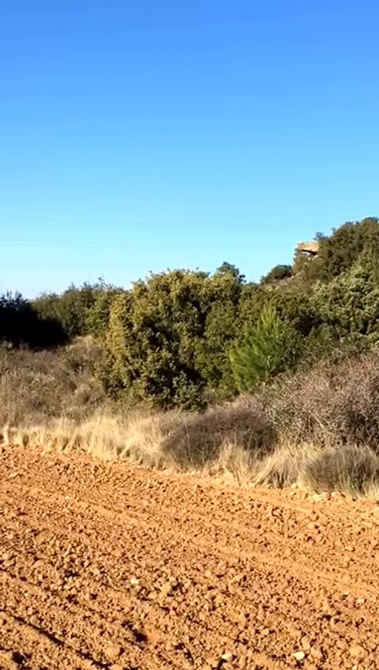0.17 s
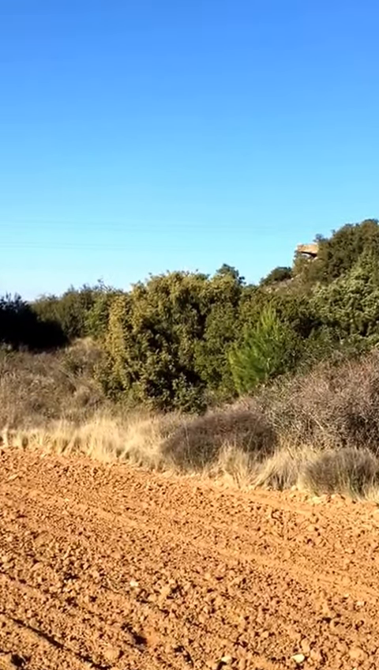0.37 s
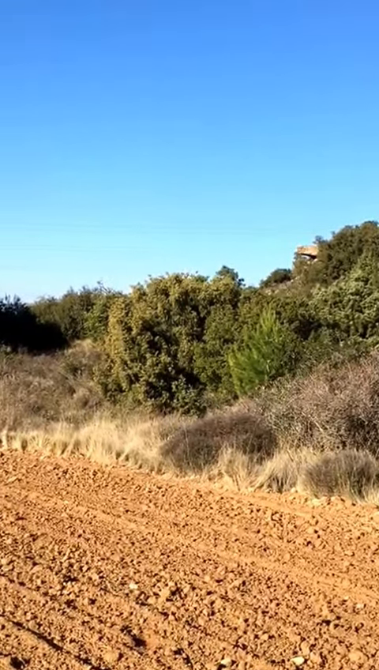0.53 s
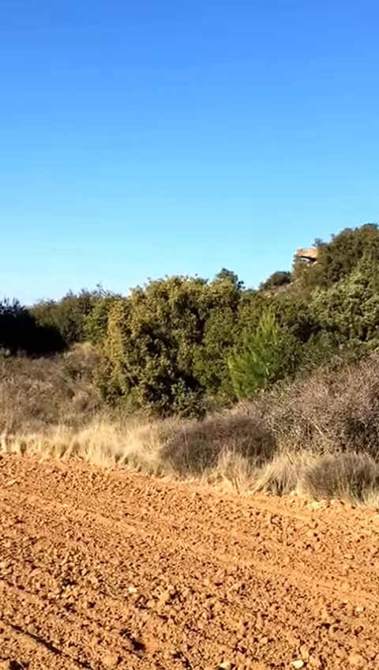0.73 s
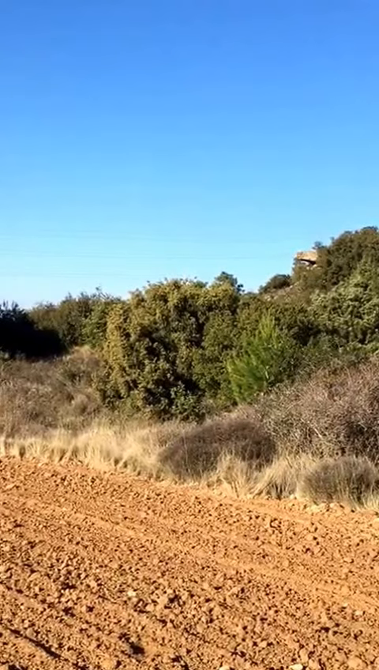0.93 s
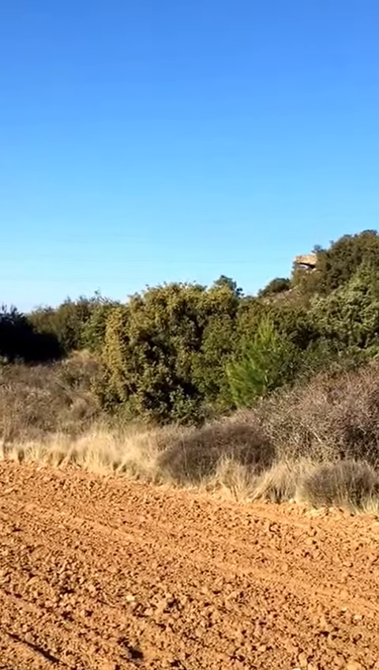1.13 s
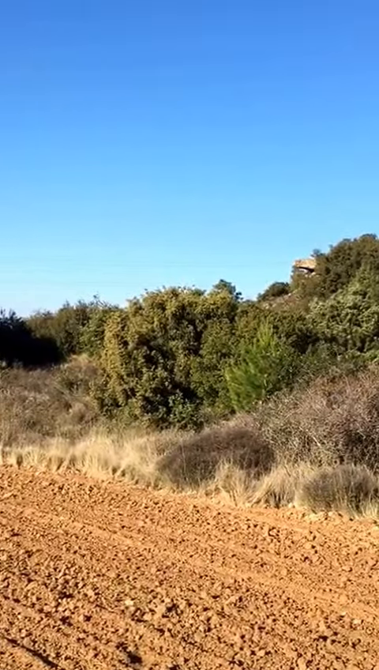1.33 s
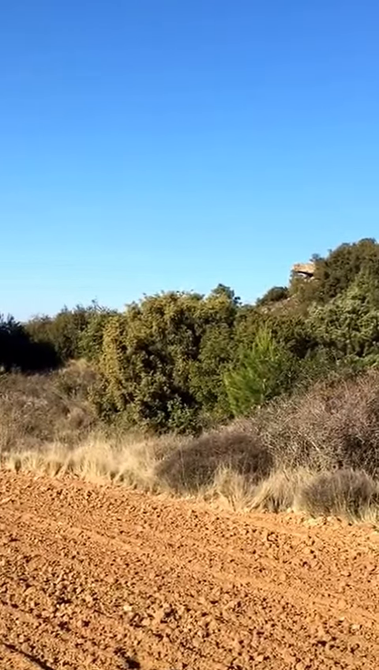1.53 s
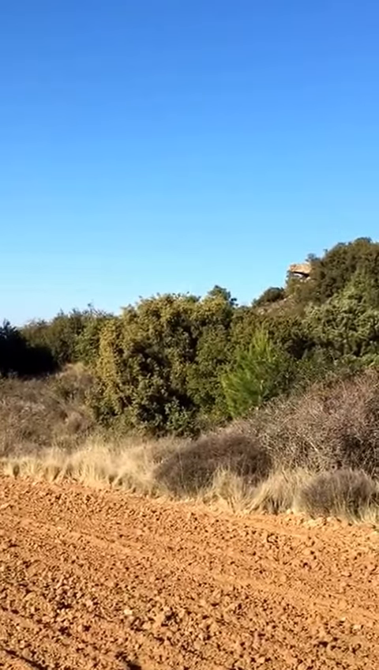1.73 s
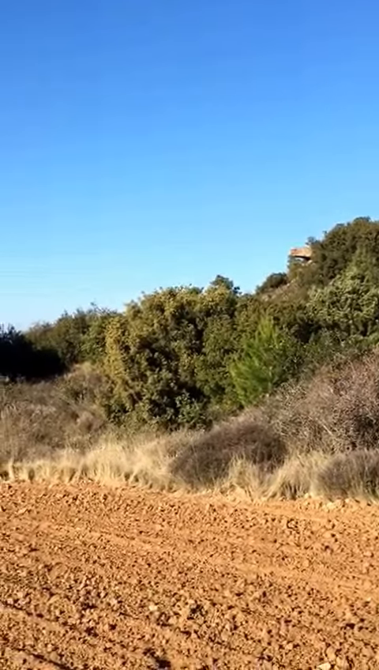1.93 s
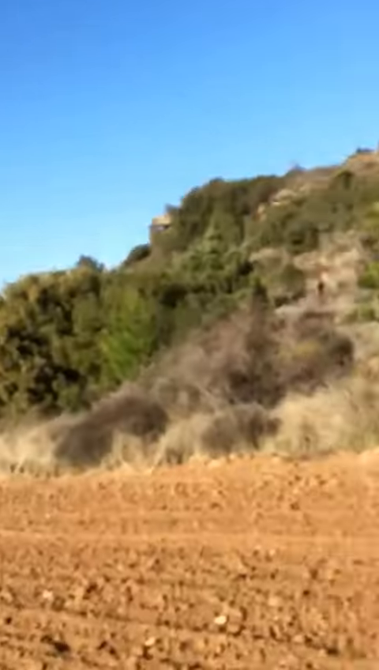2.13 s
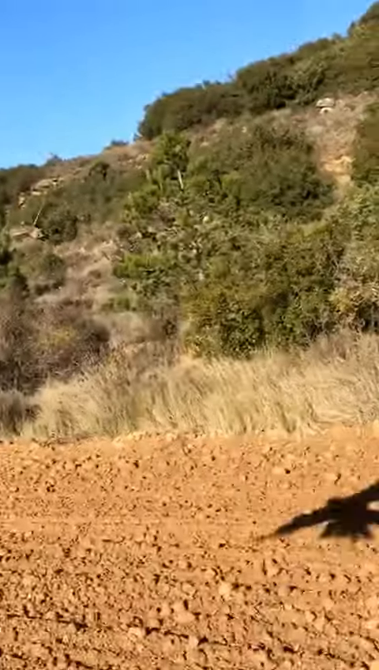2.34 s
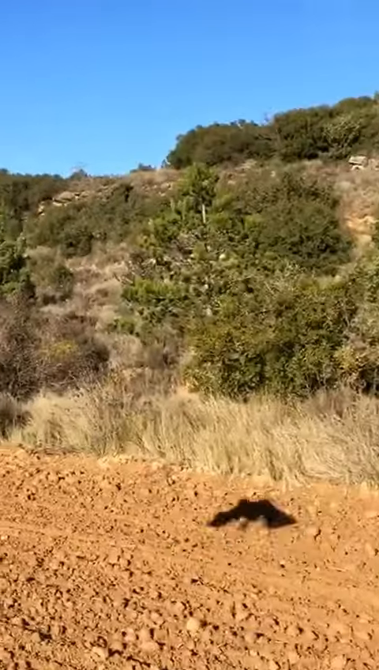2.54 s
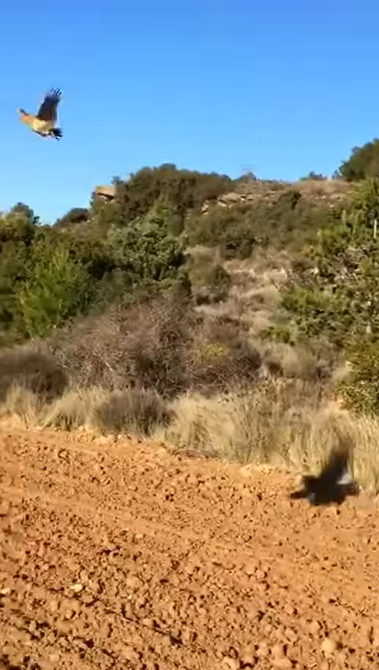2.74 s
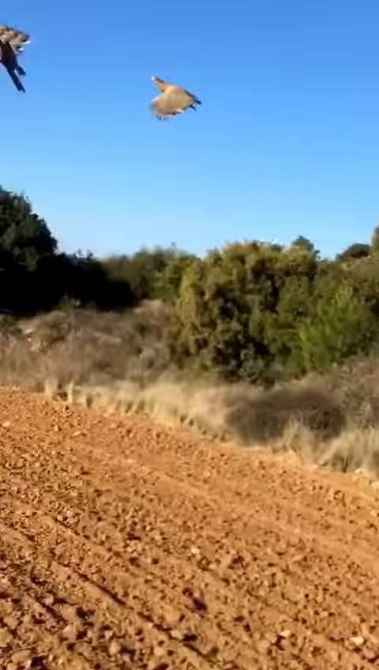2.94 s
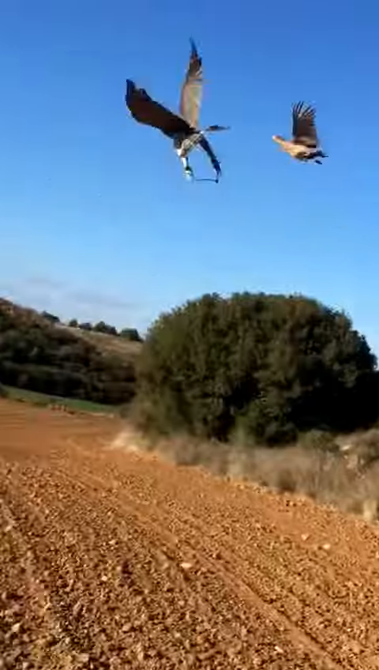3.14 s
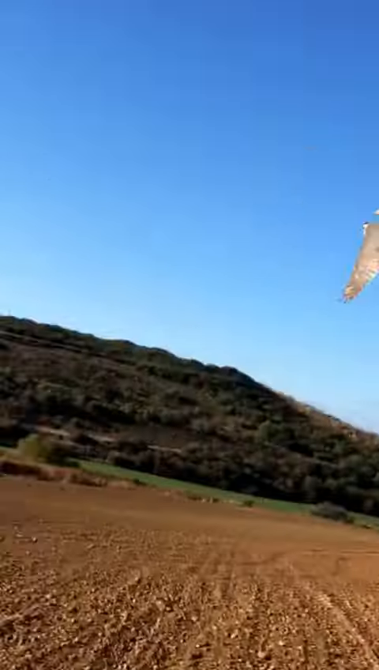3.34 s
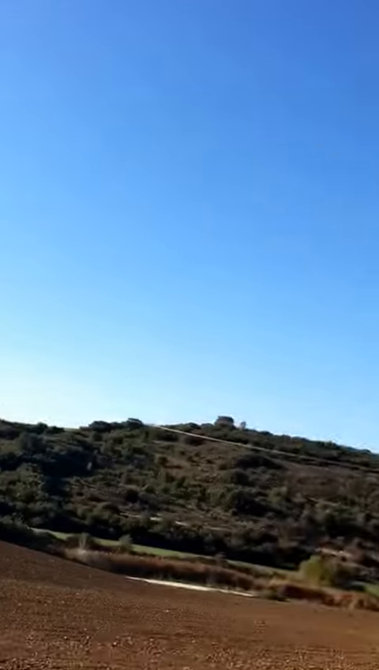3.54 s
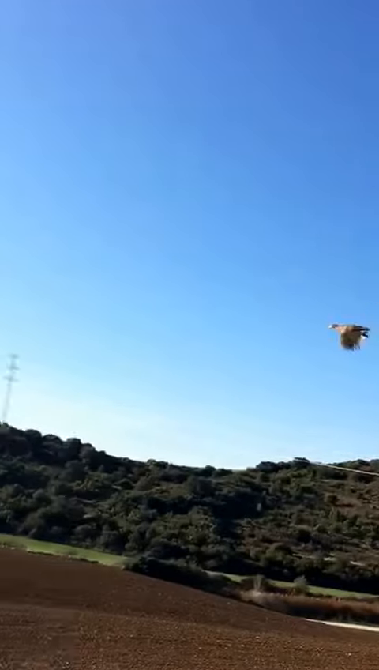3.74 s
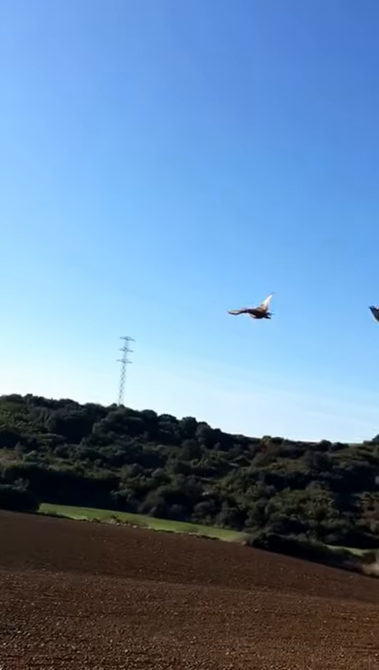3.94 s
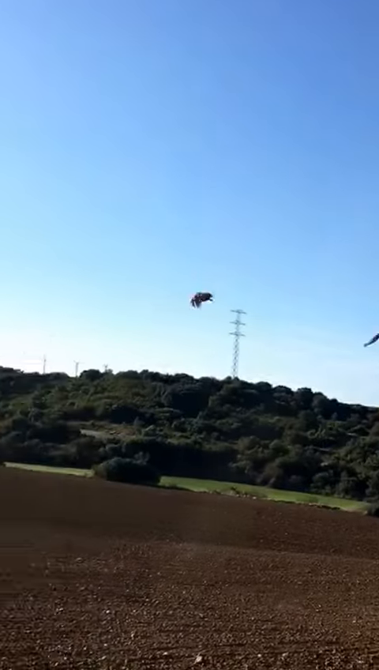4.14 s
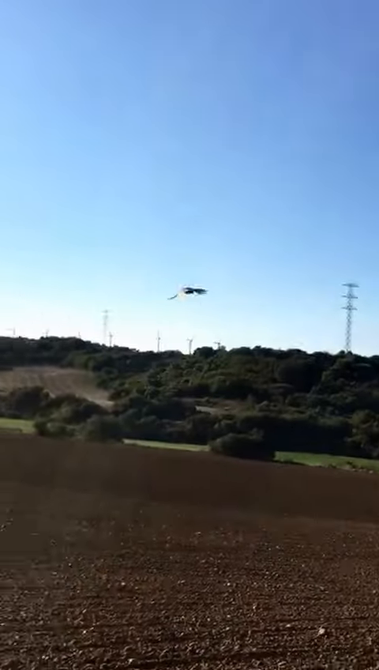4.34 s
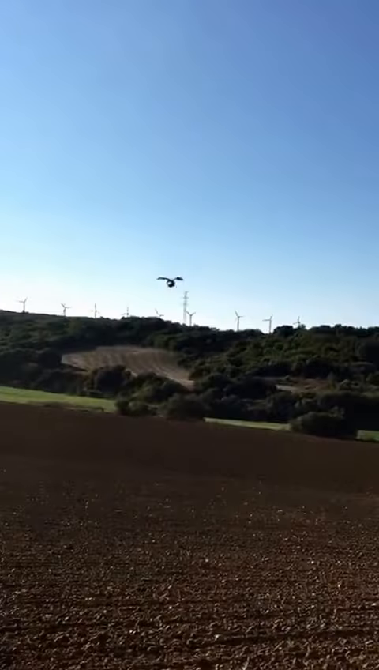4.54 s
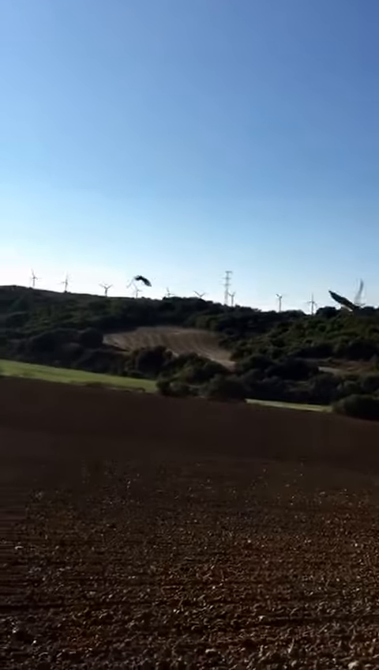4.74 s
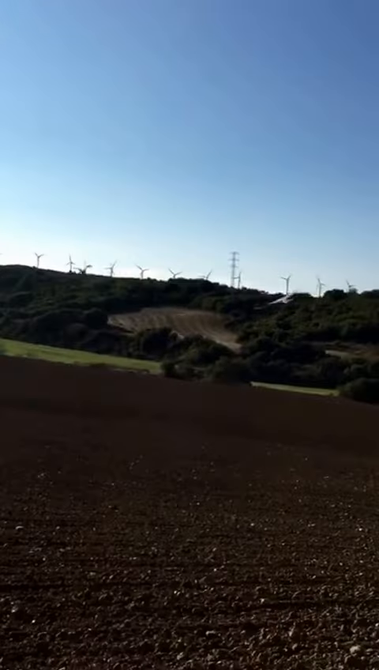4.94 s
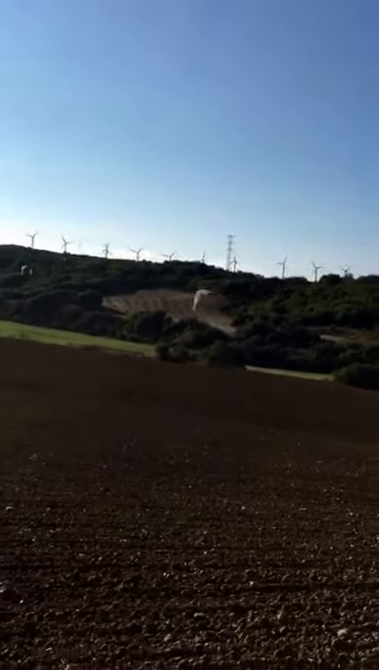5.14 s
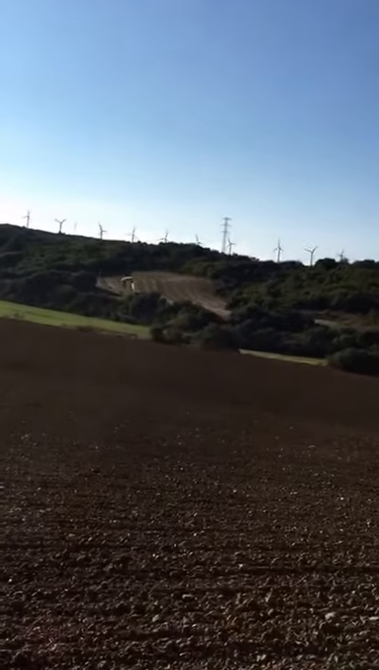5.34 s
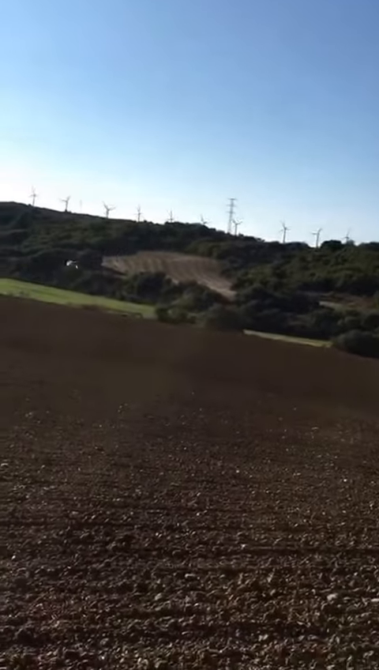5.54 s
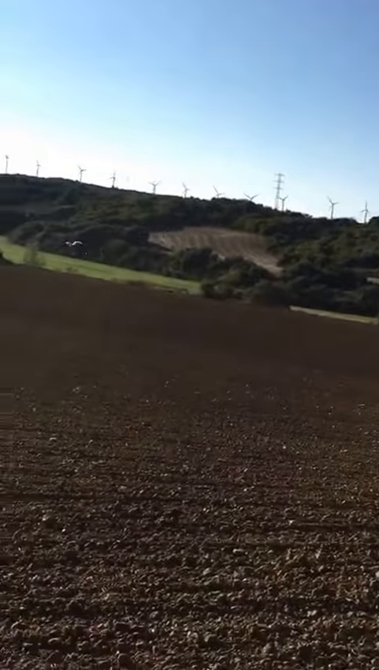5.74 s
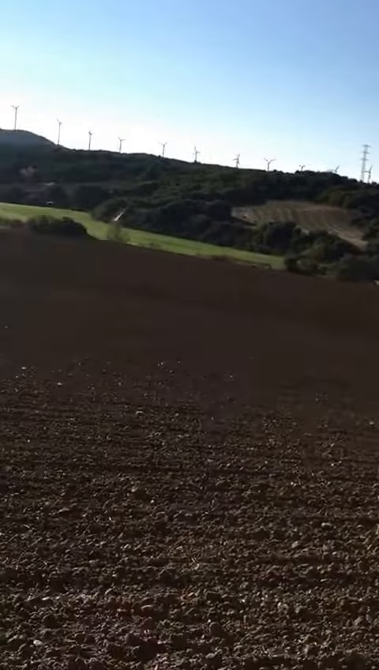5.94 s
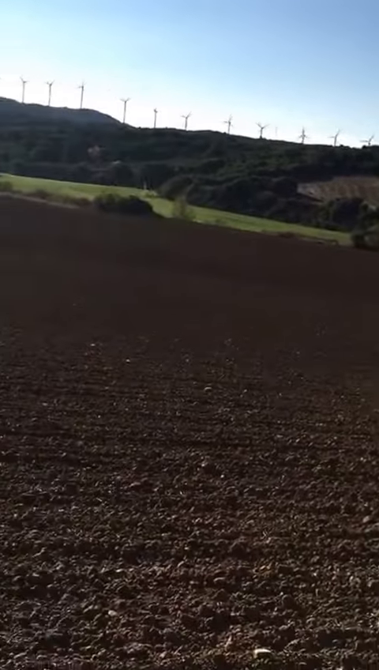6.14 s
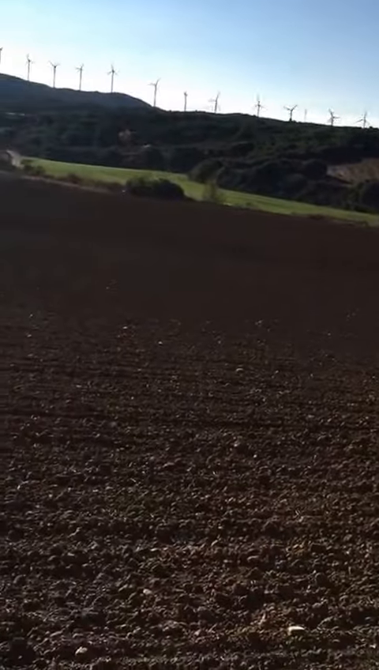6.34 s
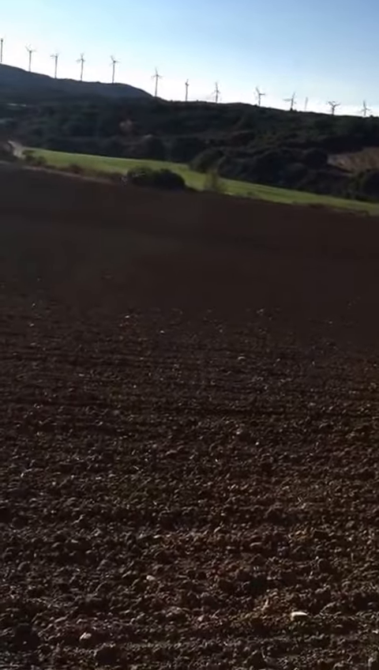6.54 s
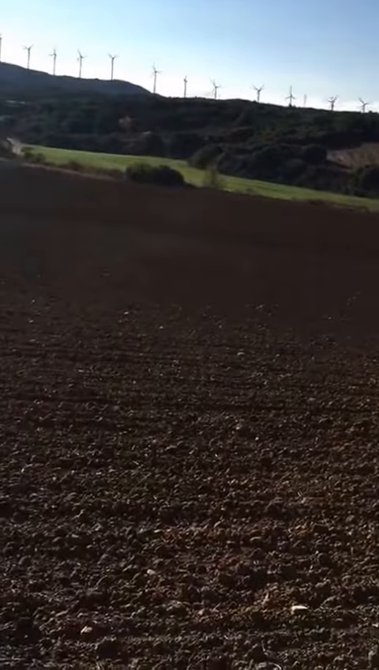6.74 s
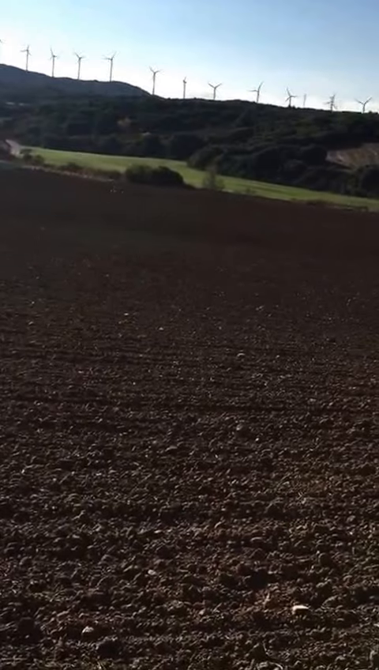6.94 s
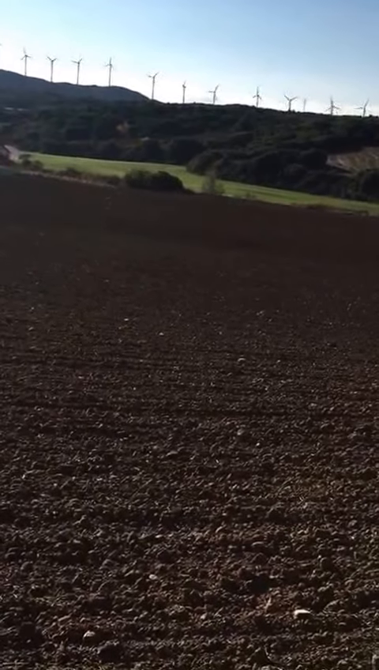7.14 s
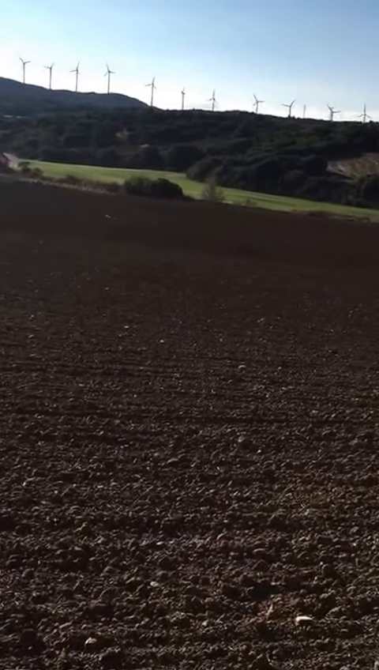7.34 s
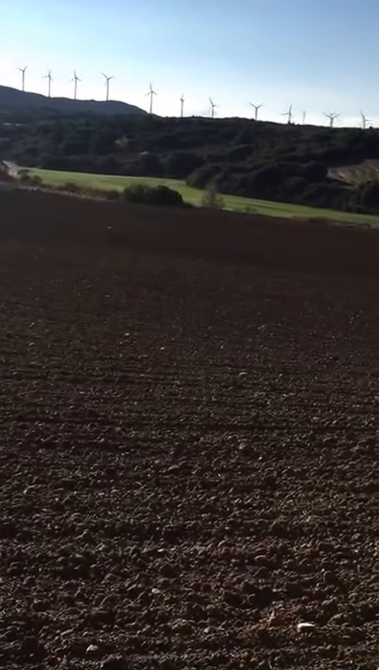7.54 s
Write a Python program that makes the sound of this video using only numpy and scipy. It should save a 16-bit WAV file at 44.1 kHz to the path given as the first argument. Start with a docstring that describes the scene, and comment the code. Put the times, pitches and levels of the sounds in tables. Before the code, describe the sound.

An outdoor handheld microphone hears a quiet ploughed field, then a sudden close flush of partridges. Wing strokes thud and puff against the microphone among snapping, rustling grass and very high piercing chirps. Fast fluttering hums and small slaps move off, the short whistled alarm calls fading with slight outdoor echoes, until only faint wind, low rumble and a few soft knocks are left.

```python
"""Wing strokes buffet the microphone as partridges burst from the edge of a ploughed field and pass close over.
Feathers and dry grass crackle around them; then the wings whirr away and thin, high alarm notes fade.
Close strokes are growing vortices with turbulence; distant beats are short falling hums, slaps and clicks.
Notes are gliding two-voiced tones with echoes; grass, wake, wind and the quiet farmland are shaped noise."""
import sys
import numpy as np
from scipy import signal
from scipy.fft import rfft, irfft
from scipy.io import wavfile
from scipy.ndimage import uniform_filter1d

SR = 44100
rng = np.random.default_rng(int(sys.argv[2]) if len(sys.argv) > 2 else 0)


def master(y):
    """Save y as 16-bit WAV."""
    cut = np.clip(np.atleast_2d(y).T, -1, 1)
    pcm = np.round(cut * 32767)  # scale
    wavfile.write(sys.argv[1], SR, pcm.astype(np.int16))


N = 339129
TIME = np.arange(N) / SR  # s

# Far wind over the hills: (time [s], level [dB])
WIND_LEVEL = [(0, -62), (1.45, -67), (5.0, -64), (5.8, -60), (7.69, -62)]
# Spectrum of that wind: (frequency [Hz], level [dB])
WIND_SPECTRUM = [(120, -26.5), (200, -7), (310, -1.5), (379, -5.5), (675, 0.5), (727, -2), (1230, -1.5),
                 (1680, -6.5), (2610, -18.5), (4000, -32.5), (5200, -48), (8800, -120)]
# Gusts in the far scrub: (time [s], peak level [dB], half width to 1/e [s])
SCRUB_GUSTS = [(6.27, -60, 0.064), (6.579, -54, 0.26), (7.14, -56.5, 0.14)]
# Spectrum of the gusts: (frequency [Hz], level [dB])
GUST_SPECTRUM = [(200, -18), (500, -8), (900, 2.5), (1400, 3.5), (2000, -8.5), (2700, -21), (4000, -29),
                 (8000, -51)]
# Spectrum of the rumble and faint hiss: (frequency [Hz], level [dB])
FLOOR_SPECTRUM = [(12, -63.5), (20, -30), (46, -3.5), (69, -1.5), (116, -12.5), (143, -17.5), (275, -31.5),
                  (429, -29), (464, -48.5), (603, -36.5), (993, -27.5), (2070, -47), (5170, -49.5),
                  (6550, -49), (10500, -53), (13600, -86), (22000, -120)]
FLOOR_DB = -53
# Spectrum of the pulsing high hiss: (frequency [Hz], level [dB])
BUZZ_SPECTRUM = [(2000, -33.5), (4500, -14), (6500, 9), (8200, -7), (9700, 2.5), (11000, -21)]
BUZZ_HZ = 60

# Nearness of the birds, as the level of their feather noise: (time [s], level [dB])
NEARNESS_CURVE = [(1.7, -98), (1.78, -62), (1.91, -57.5), (1.99, -54.5), (2.49, -54), (2.9, -58),
                  (3.3, -58.5), (4.9, -73), (5.6, -79)]

# Dry snaps of stalks and feathers: (time [s], level [dB], tilt [dB per octave])
LOUD_SNAPS = [(0.494, -48.5, 1.5), (1.8306, -35, -1), (1.8620, -37, 2.5), (1.9230, -39.5, -5),
              (1.9513, -38, -4), (1.9954, -18.5, -2), (2.075, -31, -3), (2.1330, -11, -10.5),
              (2.1997, -34.5, -3), (2.2837, -33, -1.5), (2.334, -40, -2.5), (2.4132, -35.5, -0.5),
              (2.555, -35.5, 0), (2.6517, -38, 0), (2.8280, -28.5, 1), (2.9098, -39.5, -5),
              (3.0491, -35, -7.5), (3.1177, -38, -3), (3.1917, -36, -3), (3.399, -33, -0.5),
              (3.5425, -27.5, 1), (3.7070, -40, -3.5), (3.9410, -40, -8.5)]
# Spectrum of a snap before its tilt: (frequency [Hz], level [dB])
SNAP_SPECTRUM = [(150, -4), (500, -10.5), (1100, -2.5), (1800, -0.5), (2800, -5), (4000, -4.5),
                 (6000, -7.5), (8500, -9.5), (10500, -17)]
SNAP_DECAY_S = 0.0016
SNAP_LEAD_S = 256 / SR  # silence padded ahead of a snap
SMALL_SNAPS_PER_S = 4.3
SMALL_SNAP_DB, SMALL_SNAP_SPREAD_DB = 15.5, 5.5  # relative to the nearness curve; chance spread
SMALL_SNAP_TILT_DB = -9  # per octave

# Wings brushing through dry grass: (time [s], peak level [dB])
GRASS_SWISHES = [(1.747, -42), (2.118, -32.5), (2.288, -52), (2.442, -42.5), (3.36, -53.5)]
SWISH_RISE_S, SWISH_FALL_S = 0.016, 0.0096
# Spectrum of the grass and feathers: (frequency [Hz], level [dB])
RUSTLE_SPECTRUM = [(120, -11.5), (300, -2), (700, 2), (1100, 3.5), (1800, 1), (2500, -0.5), (4900, -5),
                   (7000, -7), (9400, -6.5), (10500, -18)]
RUSTLE_DB = 5  # relative to the nearness curve

# Spectrum of the disturbed air: (frequency [Hz], level [dB])
WAKE_SPECTRUM = [(60, -11.5), (150, -1.5), (290, 3), (600, -5.5), (900, -13), (2000, -54.5)]
WAKE_DB, WAKE_FOLLOW = -54, 0.67  # level at a nearness of -60 dB; dB per dB of nearness
TRAIL_DB, TRAIL_S = -31, 0.036  # churned air left by a stroke, relative to it; its decay

# Close wing strokes: (time [s], level [dB], middle pitch [Hz], turbulence before a common lift [dB])
CLOSE_STROKES = [(1.802, -44.5, 467, -18), (1.955, -31.5, 68.3, -18), (1.996, -22.5, 71, -6.5),
                 (2.075, -18.5, 80, -12), (2.111, -12, 134.6, -8.5), (2.129, -2.5, 71.4, -8),
                 (2.130, -11.5, 198.8, -1), (2.16, -25.5, 260, -2), (2.184, -25.5, 288, -11),
                 (2.207, -26, 98, -9), (2.25, -34, 309, -4), (2.27, -31.5, 79.2, -25),
                 (2.402, -26, 70, -14.5), (2.571, -35, 480, -11), (2.579, -24, 439, 0),
                 (2.586, -26, 509, -1), (2.598, -27, 275, 2.5), (2.613, -20.5, 79.5, -7),
                 (2.704, -22.5, 78.6, -22), (2.772, -22, 196, -30), (2.79, -20, 84.6, -36),
                 (2.823, -15, 218.5, -8), (2.844, -31.5, 268, -31), (2.93, -31.5, 129, -23),
                 (2.955, -36.5, 153, -16), (3.055, -39, 117, -14), (3.642, -44, 134, -17)]
TURBULENCE_LIFT_DB = 2.5
STROKE_S, STROKE_SHRINK = 0.045, 0.49  # length of a 100 Hz vortex; power of pitch that shortens higher ones
SAG_OCTAVES, SAG_OCTAVES_PER_DB = 2.09, 0.035  # pitch fall of a 0 dB vortex; weaker ones fall less
RAGGED = 0.35  # irregular swirl, relative to a vortex's own swing

# Alarm notes: (time [s], length [s], level [dB], entry pitch [Hz], held pitch [Hz], upper voice [dB])
# Pitches are those of the direct sound; the upper voice is relative to the note.
CALLS = [(1.997, 0.05, -31.5, 9360, 7340, -2.5), (2.023, 0.061, -41.5, 6970, 6300, 2),
         (2.069, 0.033, -28.5, 8120, 7125, -36), (3.329, 0.046, -30.5, 6440, 7100, -7),
         (3.431, 0.058, -33.5, 5700, 6260, -33), (3.718, 0.049, -29, 6470, 7020, -11),
         (3.835, 0.0757, -39.5, 5060, 6100, -4), (4.19, 0.061, -41, 6350, 6970, -7),
         (4.344, 0.08, -44.5, 5330, 6840, -29), (4.726, .054, -50.5, 5885, 6920, -11),
         (5.139, 0.063, -54, 5500, 6870, -18), (5.727, 0.056, -56.5, 5760, 6640, -8),
         (6.357, 0.062, -59.5, 5300, 6720, -12), (6.758, 0.053, -62, 5150, 6640, -22.5)]
# Course of one note, before loudness scales its arch: (share of its length, level [dB])
CALL_SWELL = [(0, -14.5), (.1, -11.5), (.28, -7.5), (.38, -2.5), (.72, 1.5), (.88, -7), (1, -6.5)]
NOTE_EXIT = 0.76  # share of the held pitch at which a note ends
ROUGH_FAINT, ROUGH_LOUD = 0.46, 0.3  # roughness (0-1) of the faintest and the loudest notes
NEAR_DOPPLER, FAR_DOPPLER = 1.018, 1.065  # pitch ratios of the echoes

# The departing birds: (first beat [s], last beat limit [s], first beat period [s], slowing [s per beat])
HUM_BIRD = (3.101, 5.4, .0799, 0)
SLAP_BIRD = (3.719, 5.95, .0806, .00008)
# Strength of the humming bird's beats, before chance differences: (time [s], level [dB])
HUM_STRENGTH = [(3.1, -51), (3.3, -39.5), (3.85, -42), (4.03, -41), (4.65, -45.5), (4.9, -47), (5.4, -53.5)]
# Strength of the slapping bird's beats, before chance differences: (time [s], level [dB])
SLAP_STRENGTH = [(3.72, -45.5), (3.9, -37.5), (4.05, -53), (4.42, -38.5), (4.55, -66), (5.08, -58),
                 (5.19, -37), (5.37, -58), (5.68, -59), (5.77, -46), (5.93, -55)]
BEAT_SPREAD_DB, BEAT_SPREAD_OCTAVES = 0.7, 0.07  # chance differences from beat to beat
FLICK_TILT_DB = -4.5  # per octave, of the feather click that starts each beat

# Soft dull knocks: (time [s], level [dB], tilt [dB per octave])
DULL_KNOCKS = [(4.985, -43.5, -17), (5.446, -44.5, -17), (6.055, -46, -1.5), (6.414, -49.5, -1.5)]
# Spectrum of a knock before its tilt: (frequency [Hz], level [dB])
KNOCK_SPECTRUM = [(100, -5), (280, 2), (600, -3), (1400, -2), (2500, -12), (5000, -24), (10000, -33)]

EDGE_HZ = 10600  # upper band limit


def amp(db):
    """Decibels to gain."""
    return 10 ** (np.asarray(db) / 20)


def unit(x):
    """Scales to rms 1."""
    return x / np.sqrt(np.mean(x ** 2) + 1e-20)


def curve(x, table):
    """Reads a two-column table at x, in straight lines between its points."""
    return np.interp(x, *np.transpose(table))


def add(mix, s, sound):
    """Mixes a sound in at time s."""
    part = mix[max(round(s * SR), 0):][:len(sound)]
    part += sound[:len(part)]


def colour(x, points, tilt_db=0):
    """Filters by a spectrum, tilted by some dB per octave about 3 kHz (flat tilt below 500 Hz)."""
    hz, db = np.transpose(points)
    f = np.fft.rfftfreq(len(x), 1 / SR) + 1
    shape_db = np.interp(np.log(f), np.log(hz), db)
    slope_db = tilt_db * np.log2(np.maximum(f, 500) / 3000)
    return irfft(rfft(x) * amp(shape_db + slope_db), len(x))


def eddies(size, hz, steep=4):
    """Unit noise that falls away above hz."""
    f = np.fft.rfftfreq(size, 1 / SR)
    spectrum = rfft(rng.standard_normal(size))
    return unit(irfft(spectrum / np.sqrt(1 + (f / hz) ** steep), size))


def nearness_db(s):
    """How near the birds are at time s; they are silent before the flush and fade after the curve ends."""
    when, db = np.transpose(NEARNESS_CURVE)
    return np.interp(s, when, db, left=-160) - 15 * np.maximum(s - when[-1], 0)


def farmland():
    """A low rumble and faint hiss, under far wind that swells slowly and brightens in gusts."""
    floor = unit(colour(rng.standard_normal(N), FLOOR_SPECTRUM))
    floor = amp(FLOOR_DB) * floor * amp(1.1 * eddies(N, 5.1))
    wind = unit(colour(rng.standard_normal(N), WIND_SPECTRUM))
    wind = wind * amp(0.8 * eddies(N, 1.7)) * amp(curve(TIME, WIND_LEVEL))
    gusts = unit(colour(rng.standard_normal(N), GUST_SPECTRUM))
    gusting = sum(amp(db) * np.exp(-((TIME - s) / width) ** 2) for s, db, width in SCRUB_GUSTS)
    return floor + wind + gusts * gusting


def buzz():
    """A very faint high hiss that pulses evenly."""
    pulses = np.exp(-(TIME * BUZZ_HZ % 1) / 0.13)
    return amp(-79) * unit(colour(rng.standard_normal(N) * pulses, BUZZ_SPECTRUM))


def snap(db, tilt_db):
    """A crack, then a short crumble of smaller fractures, levelled by its loudest 2 ms."""
    t = np.arange(4096) / SR
    grain = rng.standard_normal(len(t)) * amp(4.5 * eddies(len(t), 900))
    crumble = 0.13 * np.exp(-t / 0.012)
    fade = np.minimum(t / 0.0009, 1) * (np.exp(-t / SNAP_DECAY_S) + crumble)
    crack = colour(np.pad(grain * fade, 256), SNAP_SPECTRUM, tilt_db)
    return amp(db) * crack / np.sqrt(uniform_filter1d(crack ** 2, size=88).max())


def snaps():
    """Stalks and feathers crack loudly, among small chance snaps that fade as the birds leave."""
    out = np.zeros(N)
    times = np.cumsum(rng.uniform(0.3, 1.7, size=64)) / SMALL_SNAPS_PER_S
    luck_db = SMALL_SNAP_SPREAD_DB * rng.standard_normal(len(times))
    levels = nearness_db(times) + SMALL_SNAP_DB + luck_db
    small = [(s, db, SMALL_SNAP_TILT_DB) for s, db in zip(times, levels)]
    for s, db, tilt_db in LOUD_SNAPS + small:
        add(out, s - SNAP_LEAD_S, snap(db, tilt_db))
    return out


def rustle():
    """A soft brushing with many tiny ticks in it; it follows the birds' nearness and swells at each swish."""
    struck = rng.random(N) < 700 / SR  # about 700 ticks per second
    tick_db = 3.4 * np.minimum(rng.exponential(1, N), 3.5)
    ticks = rng.standard_normal(N) * struck * amp(tick_db)
    brush = rng.standard_normal(N) * amp(2.0 * eddies(N, 28))
    level = amp(nearness_db(TIME) + RUSTLE_DB)
    for s, db in GRASS_SWISHES:
        distance = np.maximum((s - TIME) / SWISH_RISE_S, (TIME - s) / SWISH_FALL_S)
        level = level + amp(db) * np.exp(-distance)
    return level * unit(colour(unit(brush) + 0.83 * unit(ticks), RUSTLE_SPECTRUM))


def wake():
    """A low, lumpy rush of disturbed air that follows the birds and lingers after each close stroke."""
    rush = unit(colour(rng.standard_normal(N), WAKE_SPECTRUM)) * amp(2 * eddies(N, 25))
    steady = amp(WAKE_DB + WAKE_FOLLOW * (nearness_db(TIME) + 60))
    trails = np.zeros(N)
    for s, db, _, _ in CLOSE_STROKES:
        trails += amp(db + TRAIL_DB) * (TIME > s) * np.exp(-abs(TIME - s) / TRAIL_S)
    return rush * np.hypot(steady, trails)


def vortex(first_hz, last_hz, length, rise):
    """Air shed by a wing: a few pressure swings whose period grows as the eddy widens, and their envelope."""
    u = np.linspace(0, 1, int(length * SR))
    period = (1 - u) / first_hz + u / last_hz
    turns = np.cumsum(1 / period) / SR
    swell = np.sin(np.pi / 2 * np.minimum(u / rise, 1)) * np.cos(np.pi / 2 * u)
    return np.sin(2 * np.pi * turns), swell


def close_wings():
    """Each stroke throws a vortex on the microphone, with a slow push beneath and turbulence at its front."""
    out = np.zeros(N)
    for s, db, hz, turbulence_db in CLOSE_STROKES:
        sag = 2 ** (max(SAG_OCTAVES + SAG_OCTAVES_PER_DB * db, 0) / 2)
        first_hz, last_hz = hz * sag, hz / sag
        length = STROKE_S * (100 / hz) ** STROKE_SHRINK
        swing, swell = vortex(first_hz, last_hz, length, rise=0.04)
        t = np.arange(len(swing)) / SR
        puff = eddies(len(t), 650 + 0.139 * first_hz, steep=7.1) * np.exp(-t / 0.0096)
        # the finest eddies die first
        tear = 0.12 * eddies(len(t), 2220, steep=12.0) * np.exp(-t / 0.0057)
        turbulence = amp(turbulence_db + TURBULENCE_LIFT_DB) * (puff + tear)
        swirl = RAGGED * eddies(len(t), 1.32 * first_hz, steep=9.1)
        push = 0.63 * np.sin(2 * np.pi * 39 * t) / (1 + (last_hz / 110) ** 2)
        add(out, s, amp(db) * swell * (swing + swirl + push + turbulence))
    return out


def alarm_notes(doppler=1):
    """The syrinx rises or drops to a held tone and breaks downwards; its other side adds a higher whistle."""
    out = np.zeros(N)
    for s, length, db, entry_hz, held_hz, upper_db in CALLS:
        u = np.linspace(0, 1, int(length * SR))
        exit_hz = NOTE_EXIT * held_hz
        rough = np.interp(db, [-50, -30], [ROUGH_FAINT, ROUGH_LOUD])
        course = [entry_hz, (entry_hz + held_hz) / 2, held_hz, held_hz, (exit_hz + held_hz) / 2, exit_hz]
        hz = doppler * np.interp(u, [0, 0.18, 0.24, 0.82, 0.9, 1], course)
        hops = 1 - 0.08 * (rough * eddies(len(u), 160) > 0.7)  # brief downward breaks in pitch
        jitter = 1 + 0.04 * rough * eddies(len(u), 270)
        turns = np.cumsum(hz * hops * jitter) / SR
        # the octave carries the note; the fundamental beneath it is weak, most of all in low, loud notes
        below_db = np.interp(held_hz, [6200, 7000], [-7, 0]) + np.interp(db, [-47, -32], [-15, -22])
        voice = np.sin(2 * np.pi * turns) + amp(below_db) * np.sin(np.pi * turns)
        arch = np.interp(db, [-56, -36], [0.65, 1.2])  # loud notes swell more in the middle
        flutter_db = (2.0 + 2.9 * rough) * eddies(len(u), 200)
        voice *= amp(arch * curve(u, CALL_SWELL) + flutter_db)
        upper_hz = doppler * held_hz * (1.2 - 0.2 * u) * (1 + 0.01 * eddies(len(u), 400))
        whistle = np.sin(2 * np.pi * np.cumsum(upper_hz) / SR)
        upper = amp(upper_db) * whistle * np.exp(-((u - 0.36) / 0.12) ** 2)
        add(out, s, amp(db) * (voice + upper) * signal.windows.tukey(len(u), 0.1))
    return out


def scatter(x, t60, delay=0.0013):
    """Clods and bushes return a thin cloud of echoes, decaying by 60 dB in t60 seconds."""
    t = np.arange(SR // 2) / SR
    present = (rng.random(len(t)) < 3000 / SR) * (t > delay)
    taps = rng.standard_normal(len(t)) * present * amp(-60 * t / t60)
    return signal.fftconvolve(x, taps / np.linalg.norm(taps))[:N]


def far_wings(flight, level, pitch_hz, length, flick_db):
    """Each regular downstroke hums briefly with a falling pitch; hard, high strokes slap more; each clicks."""
    out = np.zeros(N)
    s, last_s, period, slowing = flight
    while s < last_s:
        luck, detune = rng.standard_normal(2)
        db = curve(s, level) + BEAT_SPREAD_DB * luck
        hz = pitch_hz * 2 ** (BEAT_SPREAD_OCTAVES * detune)
        hardness = (hz / 1000) ** 2
        swing, swell = vortex(hz * (1 + hardness), hz / (1 + hardness), length, rise=0.56)
        flutter = amp(2.6 * eddies(len(swing), 120))
        slap = (0.18 + 1.1 * hardness) * eddies(len(swing), 820, steep=2.6)
        add(out, s, amp(db) * swell * (swing * flutter + slap))
        add(out, s - SNAP_LEAD_S, snap(db + flick_db, FLICK_TILT_DB))
        s += period
        period += slowing
    return out


def knocks():
    """Short thuds with no ring: bursts of noise that rise and die within milliseconds."""
    out, t = np.zeros(N), np.arange(4096) / SR
    for s, db, tilt_db in DULL_KNOCKS:
        thud = unit(colour(rng.standard_normal(len(t)), KNOCK_SPECTRUM, tilt_db))
        add(out, s, amp(db) * thud * (t / 0.0047) * np.exp(1 - t / 0.0043))
    return out


def scene():
    """Direct sound fades as the birds leave, so the echoes gain on it."""
    notes, cracks = alarm_notes(), snaps()
    hum = far_wings(HUM_BIRD, HUM_STRENGTH, pitch_hz=301.5, length=0.026, flick_db=-20)
    slaps = far_wings(SLAP_BIRD, SLAP_STRENGTH, pitch_hz=531, length=0.012, flick_db=-8.5)
    wings = hum + slaps
    # the birds fly towards the ground ahead, so its echo comes back higher than the direct note
    near_echo = amp(-8.5) * scatter(alarm_notes(NEAR_DOPPLER), t60=0.1)
    near_echo = near_echo + amp(-19) * scatter(wings + cracks, t60=0.13)
    remote = amp(np.interp(TIME, [3.3, 4.2, 4.8, 6.5], [-37, -23, -7.0, -10]))
    far_echo = scatter(alarm_notes(FAR_DOPPLER) * remote, t60=0.25, delay=0.02)
    birds = close_wings() + wings + wake() + notes + near_echo + far_echo
    return (birds + cracks + rustle() + knocks() + farmland() + buzz())[None]


def record(dry):
    """The hardest gust overloads the microphone input, which limits smoothly; then the band limit."""
    limited = dry / (1 + dry ** 8) ** (1 / 8)
    lowpass = signal.firwin(301, EDGE_HZ, window=("kaiser", 8), fs=SR)
    return signal.oaconvolve(limited, lowpass[None], "same")


dry = scene()
out = record(dry)
master(out)
```